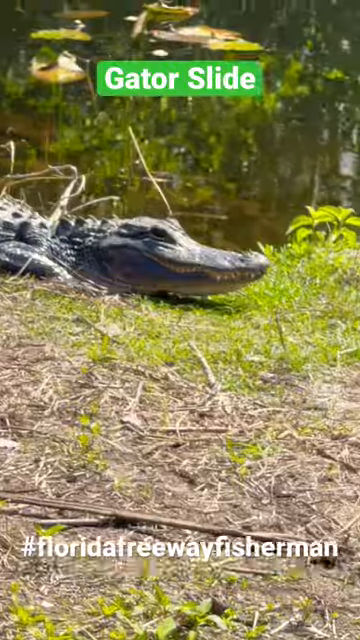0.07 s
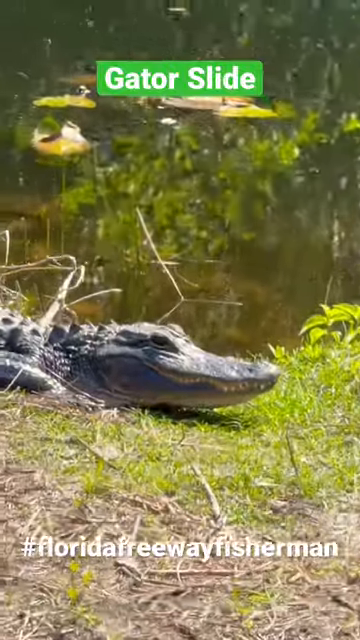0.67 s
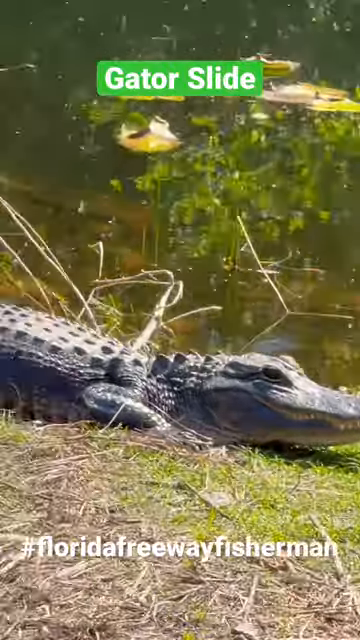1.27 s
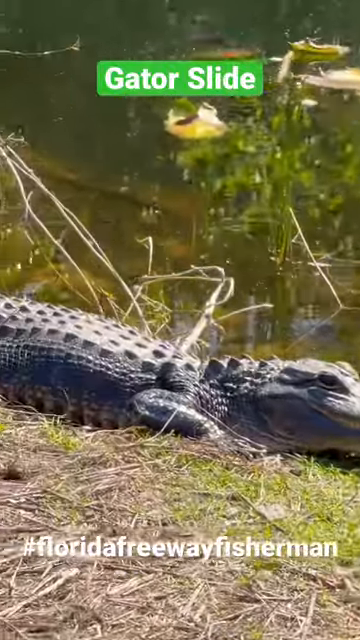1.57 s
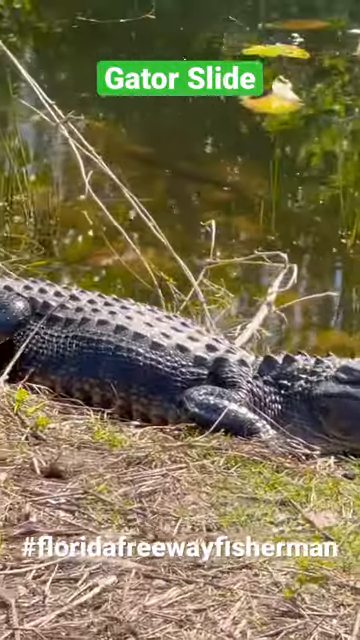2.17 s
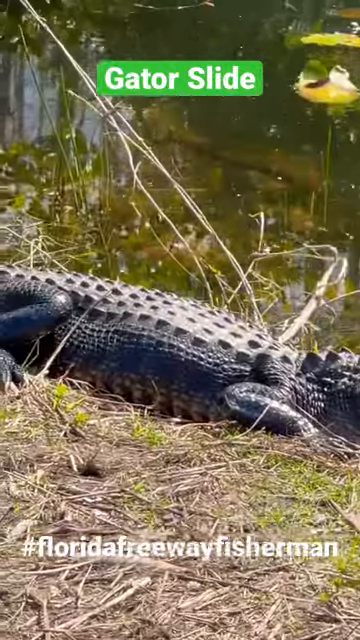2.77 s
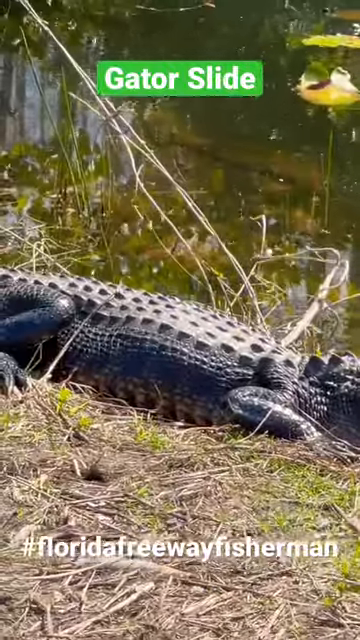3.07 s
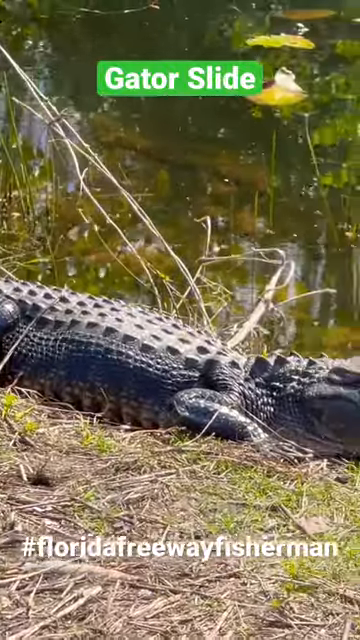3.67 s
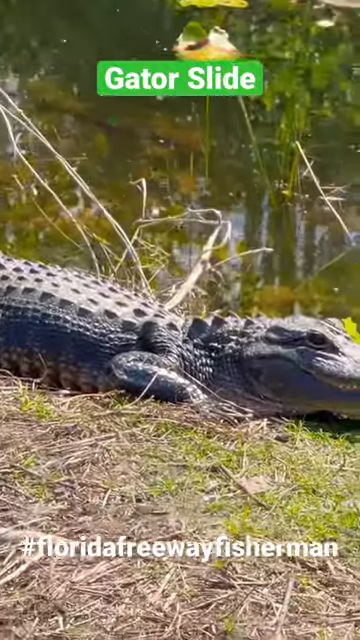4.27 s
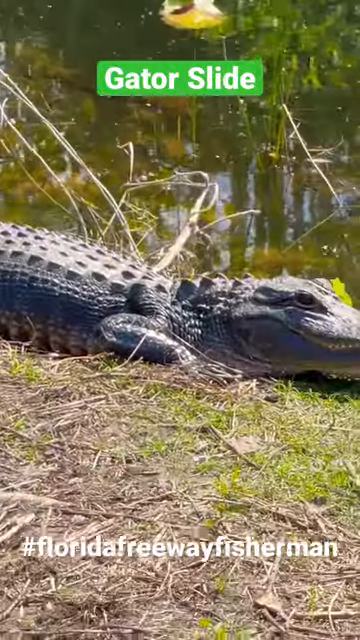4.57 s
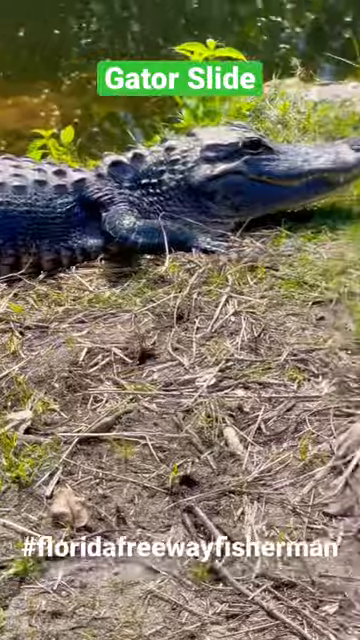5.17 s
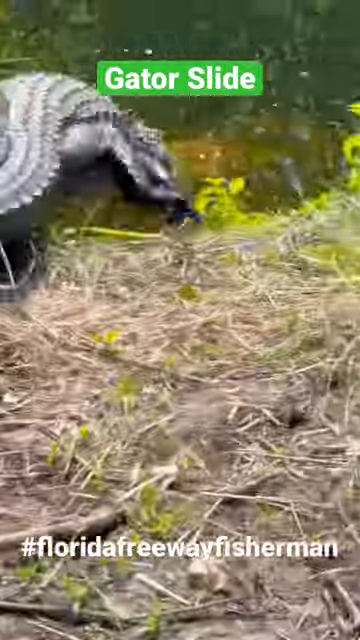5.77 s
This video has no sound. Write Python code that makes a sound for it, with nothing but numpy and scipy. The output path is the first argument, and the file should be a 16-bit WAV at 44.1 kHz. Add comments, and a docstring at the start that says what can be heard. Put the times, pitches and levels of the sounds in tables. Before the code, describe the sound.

A quiet pond bank has light rustles of dry grass, faint far birds and one blackbird's short buzzy song. Low gusts buffet the microphone around a single soft step. Near the end a sudden, very loud thump starts an alligator's rush: its belly drags through reeds, stalks crack, and it plunges in with hissing spray, bubbles and heavy plops.

```python
"""Alligator bolts into a pond

Crackling dry grass, a blackbird, one soft footstep and wind on the microphone sit over an outdoor hush.
Then the basking alligator lunges: a thump overloads the microphone, its belly scrapes through dry,
snapping reeds, and it hits the water with spray, ringing bubbles and a deep gulp as the cavity shuts."""
import sys
import numpy as np
from scipy import signal
from scipy.fft import rfft, irfft, next_fast_len
from scipy.io import wavfile
from scipy.ndimage import uniform_filter1d

SR = 44100
rng = np.random.default_rng(int(sys.argv[2]) if len(sys.argv) > 2 else 0)


def transcribe(u):
    """Save the signal u as a 16-bit wav file named by the first command-line argument.

    u: samples, shape (n,) or (channels, n), limited to [-1, 1]; the rate is SR.
    q: integer samples, one column per channel.
    """
    v = np.clip(np.atleast_2d(u).T, -1, 1)
    q = np.round(v * 32767).astype(np.int16)
    wavfile.write(sys.argv[1], SR, q)


N = 265923
TIME = np.arange(N) / SR

# outdoor bed, tone: f/Hz, level/dB
HUSH_EQ = [(25, -16.5), (55, 5), (120, 2.5), (260, -3), (500, -7), (1000, -15), (2000, -22), (3000, -26.5),
           (4500, -35), (8000, -35), (11000, -30), (13000, -42.5), (15000, -78)]
# its fader ride: t/s, level/dB
HUSH_RIDE = [(0.3, -44.5), (2.6, -45.5), (3.66, -49.2), (4.35, -47.3), (4.9, -49.3), (5.3, -42)]

# stirs of dry grass: t/s, length/s, blade level/dB, stalk level/dB
RUSTLE_CUES = [(0.09, .24, -62.5, -61), (0.343, .04, -47, -47), (0.372, .052, -45, -42.5),
               (0.45, .1, -52.5, -58), (0.65, .022, -59, -56), (0.78, .04, -64, -59),
               (0.96, .11, -61.5, -54), (1.115, .055, -56, -50.5), (1.205, .025, -60, -58),
               (1.338, .035, -57, -64), (1.725, .042, -54.5, -49), (1.96, .025, -59, -59),
               (2.335, .028, -49.5, -44), (2.383, .02, -58, -45.5), (2.438, .045, -49.5, -52),
               (2.5, .05, -57, -57), (3.74, .1, -74, -62), (4.19, .22, -70, -61), (4.6, .12, -74, -60.5),
               (5.035, .285, -63, -52.5), (5.2, .12, -55, -56)]
# tone of fine blades and coarse stalks: f/Hz, level/dB
BLADE_EQ = [(2000, -35), (5000, -7), (8000, -0.5), (11000, 6), (12300, -14), (15000, -46)]
STALK_EQ = [(150, -32), (500, 0.5), (1200, 1), (1750, 4), (2400, -1), (3000, -3), (4500, -5), (6500, -11),
            (11000, -12), (13500, -36)]

# far birds across the pond: t/s, f/Hz, level/dB, length/s
FAR_BIRD_CUES = [(0.234, 1330, -48, 0.022), (0.983, 3970, -49.5, 0.022), (2.36, 2550, -51, 0.05),
                 (2.488, 2550, -49, 0.046), (3.06, 1950, -51, 0.038), (4.606, 3300, -55, 0.03),
                 (4.688, 1800, -51.5, .035), (4.97, 2890, -54, 0.11), (5.06, 4100, -56, .16)]
FAR_GLIDE = .08  # each falls from this share above its pitch to as far below
# the blackbird's chip, one arch of pitch
CHIP_S, CHIP_LENGTH_S, CHIP_START_HZ, CHIP_END_HZ, CHIP_DB = 2.138, .031, 2870, 2760, -37.5
# slurred notes that open its song: t/s, length/s, start f/Hz, end f/Hz, level/dB
SLUR_CUES = [(2.538, .018, 3850, 3300, -39), (2.559, .031, 3300, 2980, -31.5),
             (2.607, .024, 2990, 2690, -31.5), (2.664, .027, 2800, 4050, -28.7)]
BUZZ_S, BUZZ_LENGTH_S, BUZZ_DB, BUZZ_TAPER_DB = 2.688, .318, -36.8, -6.5
BUZZ_START_HZ, BUZZ_REST_HZ, BUZZ_SAG_S = 4450, 3500, .165

# stalks snapping under body and tail: t/s, relative level/dB, woody share/dB, wood f/Hz
SNAP_CUES = [(0.3468, -41, -3, 2960), (1.2008, -34, 0, 1750), (1.3422, -33, -1, 6900),
             (4.2033, -45.5, -3, 7000), (5.4053, -16, -5, 7500), (5.4192, -12, -22, 2740),
             (5.458, -13, -7, 6000), (5.4668, -13, -9, 1500), (5.5755, -15, -12, 5000),
             (5.590, -17, -4, 2800), (5.607, -9, -18, 5870), (5.6118, -8, -14, 5870),
             (5.642, -7.5, -2.5, 2900), (5.7182, -10, -15, 6370), (5.736, -18, -3, 6500),
             (5.7946, -4, -12, 5400), (5.9213, -6, -2, 6300)]
# their bright tick: f/Hz, level/dB
TICK_EQ = [(1000, -29), (4000, -23), (8000, -8), (11300, -6), (12500, -13), (15000, -38)]
# their woody crack: multiple of its pitch, level/dB
WOOD_SHAPE = [(.25, -35), (.75, -6), (1, 0), (1.3, -7), (2, -24), (5, -45)]

# gusts on the microphone: peak t/s, half width/s, level/dB
GUST_CUES = [(1.79, .03, -29), (1.97, .05, -25), (2.1, .025, -28), (2.23, .036, -21.7),
             (2.425, .028, -19.5), (2.52, .018, -28), (2.603, .016, -22), (2.69, .035, -34),
             (2.975, .025, -43), (4.26, .014, -28), (4.425, .024, -28), (4.55, .018, -33),
             (4.67, .045, -41), (4.895, .04, -21.5), (5.22, .06, -33), (5.37, .01, -21), (5.49, .05, -29),
             (5.65, .032, -20.3), (5.8, .03, -30), (5.985, .012, -19)]
# their rumble: f/Hz, level/dB
WIND_EQ = [(15, -27), (30, -14.5), (50, 6.5), (85, -0.5), (130, -9.5), (200, -26), (320, -46), (700, -75),
           (2000, -100)]
EDDY_CROSSING_S = .0013  # an eddy reaches the right port this much later
# wind buffets on the microphone, and one soft footstep in the grass (at 2.338 s):
# t/s, level/dB, decay/s, corner f/Hz, side against mid/dB
BUFFET_AND_STEP_CUES = [(1.925, -26, 0.029, 105, -27), (2.338, -30, 0.02, 790, 1),
                        (2.394, -20, 0.028, 180, -17), (2.425, -19, 0.036, 160, -25),
                        (2.68, -31.5, 0.032, 175, -31), (4.535, -24, 0.0082, 320, -35),
                        (4.838, -22, 0.021, 215, -20), (4.876, -13.5, 0.021, 205, -29),
                        (4.938, -24, 0.017, 238, -18), (5.312, -16, 0.024, 480, 2),
                        (5.579, -18.5, 0.012, 340, 0), (5.798, -24, 0.018, 220, -2)]

# crack and grit of the lunge's thump: f/Hz, level/dB
CRACK_EQ = [(200, -6), (500, -3), (1400, 0), (3000, -12), (7000, -29), (14000, -29)]
GRIT_EQ = [(80, -12), (220, -6), (420, 1), (1100, -3), (2200, -22), (5000, -33), (11000, -25),
           (14000, -46)]
THUMP_S, THUMP_DRIVE_DB, THUMP_DECAY_S = 5.3274, 6, .011

# one long drag through reeds, harder shoves on top: t/s, length/s, fizz level/dB, crunch level/dB
SCRAPE_CUES = [(5.335, .065, -37, -45), (5.398, .37, -28, -38), (5.42, .115, -32, -36),
               (5.446, .025, -20, -29.5), (5.555, .09, -22.3, -34), (5.595, .018, -18, -37),
               (5.63, .018, -27, -32), (5.66, .08, -28, -42)]
# tone of its two layers: f/Hz, level/dB
FIZZ_EQ = [(1500, -16), (3500, -14), (4700, -11), (6500, -12), (8500, -8), (10000, -4), (11300, 1),
           (12500, -13), (13500, -18), (15500, -29)]
CRUNCH_EQ = [(100, -2), (250, 5), (500, 3), (900, -0.5), (2000, -7), (2800, -1.5), (4000, -13), (7000, -9),
             (14000, -40)]

# tone of spray, churning water and cavity: f/Hz, level/dB
SPRAY_EQ = [(2000, -18), (4000, -12), (8000, -9), (10000, -4), (11300, 2), (12500, -9), (13500, -18),
            (14300, -44.5)]
WATER_EQ = [(300, -20), (750, -7.5), (1000, -7), (1450, 1.5), (2800, -4.5), (4200, -9.5), (7000, -10.5),
            (10000, -22), (15000, -40)]
CAVITY_EQ = [(60, 11), (150, 3), (300, -0.5), (450, 3), (700, 2), (1100, -6), (2000, -28), (6000, -60)]
PLUNGE_S, PLUNGE_ATTACK_S = 5.785, .008
SPRAY_DB, SPRAY_HOLD_S, SPRAY_RELEASE_S = -16.2, .05, .21
ENTRY_DB = -29  # churning as the snout cuts in, before the trunk follows
CHURN_S, CHURN_DB, CHURN_BUILD_S = 5.828, -23.5, .022
CAVITY_DB, GULP_S, GULP_WIDTH_S, GULP_DB = -29, 6.002, .03, -15
# big air pockets collapsing: t/s, level/dB, f/Hz, cycles per decay time
PLOP_CUES = [(5.798, -21, 380, .9), (5.846, -21, 900, 2.5), (5.876, -15, 2100, 2.5), (5.955, -17, 3300, 4),
             (5.962, -14, 600, 1.2), (5.969, -18, 1100, 3), (5.981, -4, 185, .45), (6.0115, -4.5, 560, .8)]
PLOP_RISE, PLOP_SMACK_DB = .04, -7
# their wet smack: multiple of the plop's pitch, level/dB
SMACK_SHAPE = [(.25, -18), (1, 0), (2, -8), (10, -45)]

# phase between the microphone's ports: f/Hz, left lead/rad
STEREO_PHASE = [(300, 0), (1900, 0), (2600, .6), (4100, .6), (4700, 2), (5050, 4.2), (5600, 6.25),
                (6200, 6.3), (8600, 9.4), (9550, 9.5), (11500, 11.5), (11850, 12.55)]
# pan curve, scaled by `lean`: f/Hz, left minus right/dB
STEREO_LEAN = [(60, -2), (200, -2.5), (370, -4.5), (680, -3.5), (1260, -.5), (2300, 0)]
# stereo width of bank and pond: f/Hz, scatter against direct/dB
BANK_SCATTER = [(100, -12.5), (200, -11.5), (380, 0.5), (1050, -4), (1600, -14), (2600, -22.5), (4400, -5),
                (5900, -35), (7300, 13), (9000, -28.5), (10500, 0), (12500, -9)]
POND_SCATTER = [(150, 1), (500, -8), (1100, -15), (1700, -40), (2600, -20), (4400, -7), (5900, -15),
                (7300, 11), (9000, -29), (10500, 1), (12500, -36)]
# the level starts low and later dips briefly: t/s, depth/dB
LEVEL_DIPS = [(0, -80), (4.97, -22)]
DIP_RECOVERY_S, HIGH_CUT_HZ = .03, 15400


def amp(db):
    """Decibels to gain."""
    return 10 ** (np.asarray(db) / 20)


def unit(x):
    """Scales to rms 1."""
    return x / np.sqrt(np.mean(x ** 2) + 1e-20)


def over_hz(points, hz):
    """Reads a curve on a log-frequency axis."""
    f, value = np.transpose(points)
    return np.interp(np.log(hz + 1), np.log(f + 1), value)


def stroke(s, length_s, attack_s, release_s):
    """An attack, hold and release envelope."""
    attack = np.clip((TIME - s) / attack_s, 0, 1)
    return attack * np.exp(-np.maximum(TIME - s - length_s, 0) / release_s)


def strokes(cues, attack_s, release_s):
    """Envelopes for a fine and a coarse layer; overlapping strokes add in power."""
    power = sum(np.outer(amp(dbs), stroke(s, length_s, attack_s, release_s)) ** 2
                for s, length_s, *dbs in cues)
    return np.sqrt(power)


def swell(peak_s, width_s):
    """A rounded rise and fall."""
    fall = np.exp(-np.abs(TIME - peak_s) / width_s)
    return 2 * fall / (1 + fall ** 2)


def add(mix, s, sound):
    """Drops a sound into the mix at time s."""
    part = mix[..., max(round(s * SR), 0):][..., :sound.shape[-1]]
    part += sound[..., :part.shape[-1]]


def eq(x, curve):
    """Shapes the tone with an EQ curve, then scales to rms 1."""
    size = next_fast_len(len(x))
    gain = amp(over_hz(curve, np.fft.rfftfreq(size, 1 / SR)))
    return unit(irfft(rfft(x, size) * gain, size)[:len(x)])


def noise(curve, samples=N):
    """Steady coloured noise."""
    return eq(rng.standard_normal(samples), curve)


def steadied(x, span_s):
    """Levels out the slow chance swings of a noise."""
    power = uniform_filter1d(x ** 2, max(int(span_s * SR), 3))
    return x / np.sqrt(np.abs(power) + 1e-9)


def grains(per_s, low_hz, high_hz, cycles, spread_db, rise=0, pitches=24):
    """A shower of damped rings of uneven size; `rise` bends them up like bubbles nearing the surface."""
    out = np.zeros(N)
    for hz in np.geomspace(low_hz, high_hz, pitches):
        age = np.arange(0, 5, hz / (cycles * SR))  # in decay times
        ring = np.exp(-age) * np.sin(2 * np.pi * cycles * age * (1 + rise * age))
        sizes = amp(spread_db * np.minimum(rng.exponential(1, N), 4))
        hits = rng.random(N) < per_s / pitches / SR
        out += hz * signal.oaconvolve(sizes * hits * rng.choice([-1, 1], N), ring)[:N]
    return unit(out)


def ports(x, scatter_curve, lean):
    """Two microphone ports: a phase lag, low mids leaning right, and ground scatter for width."""
    hz, _, direct = signal.stft(x, SR, nperseg=512, noverlap=384)
    share = amp(over_hz(scatter_curve, hz))[:, None]
    scatter = 2 * share * direct * np.exp(2j * np.pi * rng.random(direct.shape))
    pan = amp(.5 * lean * over_hz(STEREO_LEAN, hz))
    turn = (np.exp(.5j * over_hz(STEREO_PHASE, hz)) * pan)[:, None]
    pair = np.array([(direct + scatter) * turn, (direct - scatter) / turn]) / np.sqrt(1 + share ** 2)
    return signal.istft(pair, SR, nperseg=512, noverlap=384)[1][:, :N]


def hush():
    """A bed of distant air and traffic."""
    return amp(np.interp(TIME, *np.transpose(HUSH_RIDE))) * noise(HUSH_EQ)


def rustle():
    """Dry blades and stalks of grass crackle against each other."""
    blades = eq(grains(per_s=4500, low_hz=3000, high_hz=12800, cycles=1.4, spread_db=2.5), BLADE_EQ)
    stalks = eq(grains(per_s=3000, low_hz=388, high_hz=8300, cycles=2.4, spread_db=2.5), STALK_EQ)
    blade_gain, stalk_gain = strokes(RUSTLE_CUES, attack_s=.012, release_s=.022)
    return blade_gain * blades + stalk_gain * stalks


def whistle(contour, octave_db, trill, trill_hz, waver=.006):
    """Start time and sound of a bird note: a gliding tone with its octave and a fast pitch flutter."""
    s, hz, db = np.transpose(contour)
    t = np.arange(s[0], s[-1], 1 / SR)
    drift = unit(uniform_filter1d(rng.standard_normal(SR), size=200))[:len(t)]
    flutter = trill * np.sin(2 * np.pi * trill_hz * t) + waver * drift
    phase = 2 * np.pi * np.cumsum(np.interp(t, s, hz) * (1 + flutter)) / SR
    tone = unit(np.sin(phase) + amp(octave_db) * np.sin(2 * phase))
    return s[0], tone * amp(np.interp(t, s, db)) * signal.windows.tukey(len(t), .02)


def slur(s, length_s, start_hz, end_hz, db, arch=0, ends_db=-18):
    """Contour of a short glide, loudest in the middle, where `arch` lifts the pitch by that share."""
    u = np.linspace(0, 1)
    edge = (2 * u - 1) ** 2
    hz = (start_hz + (end_hz - start_hz) * u) * (1 + arch * (1 - edge))
    return np.transpose([s + length_s * u, hz, db + ends_db * edge])


def buzz():
    """Contour of the song's closing buzz: the pitch sags to rest while the level swells and eases."""
    u = np.linspace(0, 1)
    t = BUZZ_LENGTH_S * u
    hz = BUZZ_REST_HZ + (BUZZ_START_HZ - BUZZ_REST_HZ) * np.exp(-(t / BUZZ_SAG_S) ** 1.5)
    return np.transpose([BUZZ_S + t, hz, BUZZ_DB + BUZZ_TAPER_DB * (2 * u - 1) ** 2])


def woods(x, wet_db, t60):
    """Trunks around the pond scatter a call into a reverb tail."""
    t = np.arange(SR) / SR
    echoes = rng.standard_normal(SR) * (rng.random(SR) < 2500 / SR)
    tail = echoes * amp(-60 * t / t60) * (t > .006)
    return x + amp(wet_db) * signal.oaconvolve(x, tail / np.linalg.norm(tail))[:N]


def birds():
    """A blackbird chips and sings among the trees; others call from far away."""
    chip, song, far = np.zeros((3, N))
    contour = slur(CHIP_S, CHIP_LENGTH_S, CHIP_START_HZ, CHIP_END_HZ, CHIP_DB, arch=.17, ends_db=-14)
    add(chip, *whistle(contour, octave_db=10.5, trill=.004, trill_hz=295))
    for cue in SLUR_CUES:
        add(song, *whistle(slur(*cue), octave_db=-41, trill=.02, trill_hz=195, waver=.011))
    add(song, *whistle(buzz(), octave_db=-41, trill=.027, trill_hz=140))
    for s, hz, db, length_s in FAR_BIRD_CUES:
        contour = slur(s, length_s, hz * (1 + FAR_GLIDE), hz * (1 - FAR_GLIDE), db, ends_db=-16)
        add(far, *whistle(contour, octave_db=-16, trill=.09, trill_hz=170, waver=.06))
    return (woods(chip, wet_db=-2.5, t60=.42) + woods(song, wet_db=-3, t60=.78)
            + woods(far, wet_db=-4, t60=.6))


def snaps():
    """Stalks break: a bright tick layered with a woody crack at the stalk's own pitch."""
    out, t = np.zeros(N), np.arange(2048) / SR
    decay = np.exp(-t / .002) + .08 * np.exp(-t / .014)
    for s, db, wood_db, hz in SNAP_CUES:
        tick = noise(TICK_EQ, len(t))
        crack = noise(np.multiply(WOOD_SHAPE, (hz, 1)), len(t))
        wood = np.clip(amp(wood_db), 0, 1)
        burst = np.sqrt(1 - wood ** 2) * tick + wood * crack
        add(out, s, amp(db - 2.5) * burst * decay)
    return out


def wind_and_footstep():
    """Eddies rumble on both ports; short noise thuds make the wind buffets and one soft step in grass."""
    force = np.sqrt(sum((amp(db) * swell(s, width_s)) ** 2 for s, width_s, db in GUST_CUES))
    rumble = force * steadied(noise(WIND_EQ), span_s=.052)
    out = np.array([rumble, amp(1.3) * np.interp(TIME - EDDY_CROSSING_S, TIME, rumble)])
    t = np.arange(SR // 3) / SR
    for s, db, decay_s, corner_hz, side_db in BUFFET_AND_STEP_CUES:
        band = signal.butter(4, [corner_hz / 3, corner_hz], "band", fs=SR, output="sos")
        mid, side = (steadied(signal.sosfilt(band, white), span_s=.0162)[-len(t):]
                     for white in rng.standard_normal((2, SR)))
        thud = unit(np.array([mid + amp(side_db) * side, mid - amp(side_db) * side]))
        add(out, s, amp(db) * thud * (1 - np.exp(-t / .0022)) * np.exp(-t / decay_s))
    return out


def thump():
    """The lunge slams air into the ports, right first: a crack that dives into a low wobble."""
    out, t = np.zeros((2, N)), np.arange(SR // 6) / SR
    hz = 45 + 1600 / (1 + (t / .0018) ** 1.6)  # the eddies grow, so their pitch falls
    wobble = unit(uniform_filter1d(rng.standard_normal(len(t)), 40))
    push = np.sin(2 * np.pi * np.cumsum(hz * (1 + .2 * wobble)) / SR) * np.exp(-t / THUMP_DECAY_S)
    crack = amp(2.5) * noise(CRACK_EQ, len(t)) * np.exp(-t / .0026)
    attack = 1 - np.exp(-t / .00045)
    for port, late_s in zip(out, (.0008, 0)):
        grit = amp(-9.5) * noise(GRIT_EQ, len(t)) * np.exp(-t / .0145)
        add(port, THUMP_S + late_s, amp(THUMP_DRIVE_DB) * (push + grit + crack) * attack)
    return out * amp([[-1.2], [1.2]])  # panned a little right


def scrape():
    """Scales drag over dry reeds: a dense, fine fizz on top of a coarser crunch."""
    fizz = grains(per_s=12000, low_hz=2450, high_hz=13800, cycles=2, spread_db=2)
    crunch = grains(per_s=4500, low_hz=194, high_hz=6840, cycles=1.45, spread_db=2.7)
    fizz_gain, crunch_gain = strokes(SCRAPE_CUES, attack_s=.015, release_s=.018)
    return fizz_gain * eq(fizz, FIZZ_EQ) + crunch_gain * eq(crunch, CRUNCH_EQ)


def splash():
    """Spray flies and thins, bubbling churn builds as the body sinks, then the cavity gulps shut."""
    spray = eq(grains(per_s=10000, low_hz=2410, high_hz=13700, cycles=2.2, spread_db=1.5), SPRAY_EQ)
    slaps = grains(per_s=4000, low_hz=505, high_hz=9250, cycles=1.5, spread_db=3)
    bubbles = grains(per_s=1600, low_hz=598, high_hz=7070, cycles=9, spread_db=3, rise=.0243)
    glugs = grains(per_s=1200, low_hz=131.3, high_hz=1385, cycles=3.44, spread_db=3, rise=.026)
    water = eq(slaps + amp(-2) * bubbles, WATER_EQ)
    cavity = steadied(eq(glugs, CAVITY_EQ), span_s=.04)
    entered = np.clip((TIME - PLUNGE_S) / PLUNGE_ATTACK_S, 0, 1)
    sunk = 1 - np.exp(-np.maximum(TIME - CHURN_S, 0) / CHURN_BUILD_S)
    spray_gain = amp(SPRAY_DB) * stroke(PLUNGE_S, SPRAY_HOLD_S, PLUNGE_ATTACK_S, SPRAY_RELEASE_S)
    water_gain = amp(ENTRY_DB) * entered + amp(CHURN_DB) * sunk
    cavity_gain = amp(CAVITY_DB) * entered + amp(GULP_DB) * swell(GULP_S, GULP_WIDTH_S)
    return spray_gain * spray + water_gain * water + cavity_gain * cavity


def plops():
    """Big pockets of air collapse: each rings for a few cycles, rising in pitch, with a wet smack."""
    out, t = np.zeros(N), np.arange(2048) / SR
    for s, db, hz, cycles in PLOP_CUES:
        age = t * hz / cycles  # in decay times
        ring = np.sin(2 * np.pi * hz * t * (1 + PLOP_RISE * age))
        smack = noise(np.multiply(SMACK_SHAPE, (hz, 1)), len(t))
        add(out, s, amp(db) * (ring + amp(PLOP_SMACK_DB) * smack) * age * np.exp(1 - age))
    return out


def scene():
    """The stereo mix: bank, pond, wind, footstep and thump."""
    bank = ports(hush() + rustle() + birds() + scrape() + snaps(), BANK_SCATTER, lean=.3)
    pond = ports(splash() + plops(), POND_SCATTER, lean=.95)
    return bank + pond + wind_and_footstep() + thump()


def record(dry):
    """Master chain: a quick fade-in and one brief dip, hard clipping at full scale, then a high cut."""
    dip_db = sum(db * (TIME >= s) * np.exp(-np.abs(TIME - s) / DIP_RECOVERY_S) for s, db in LEVEL_DIPS)
    clipped = np.clip(dry * amp(uniform_filter1d(dip_db, size=6)), -1, 1)
    high_cut = signal.firwin(511, HIGH_CUT_HZ, window=("kaiser", 9), fs=SR)
    return signal.oaconvolve(clipped, high_cut[None], "same")


dry = scene()
out = record(dry)
transcribe(out)
```